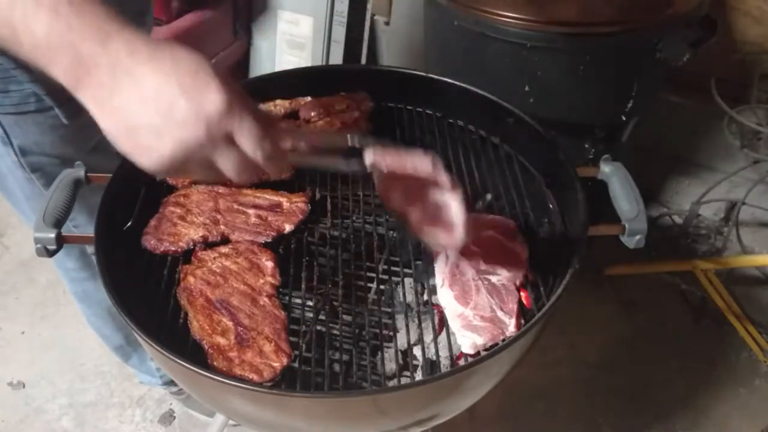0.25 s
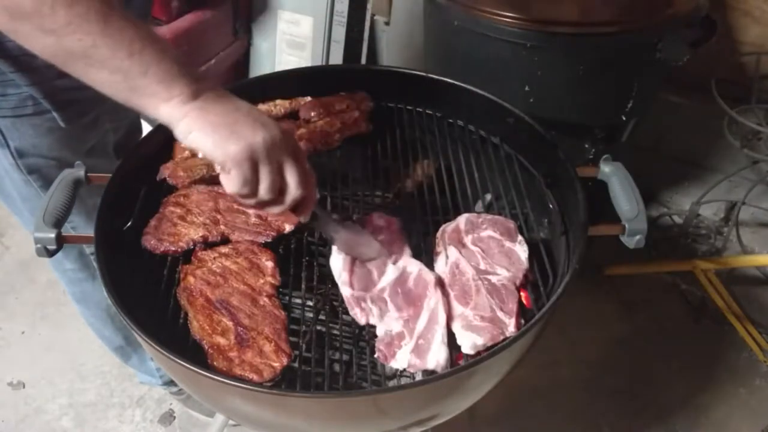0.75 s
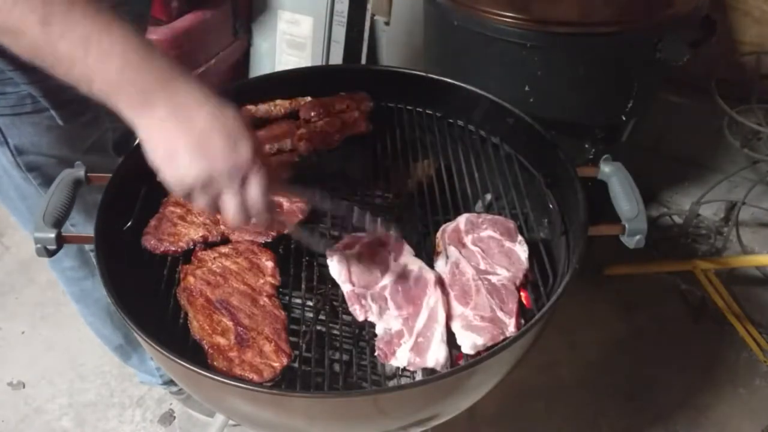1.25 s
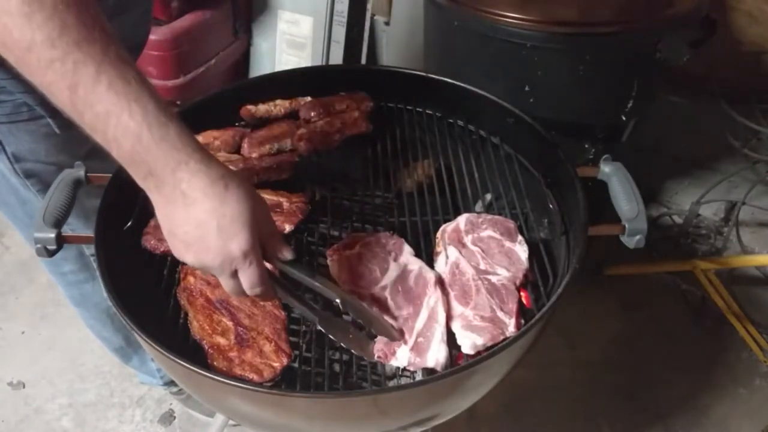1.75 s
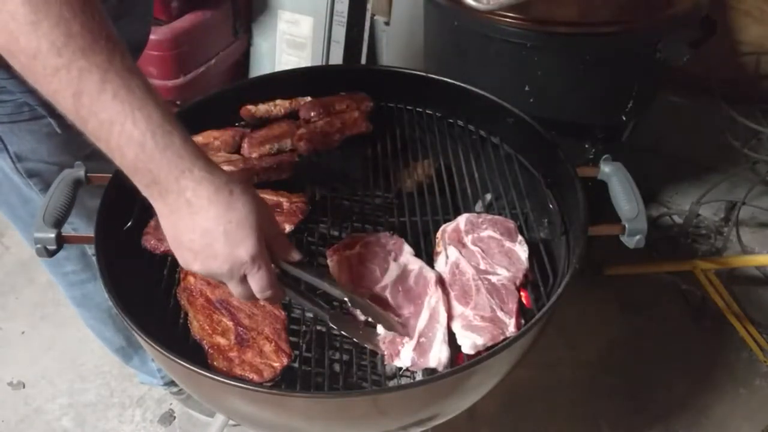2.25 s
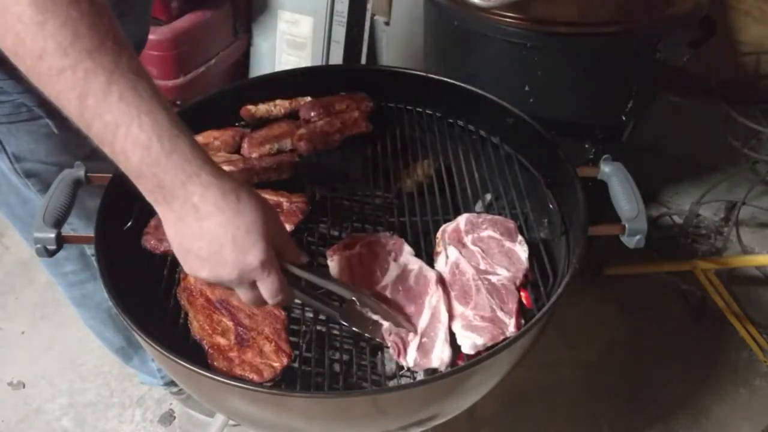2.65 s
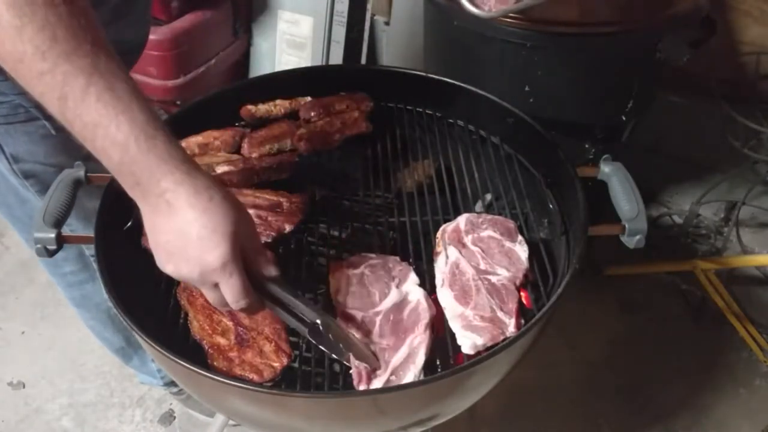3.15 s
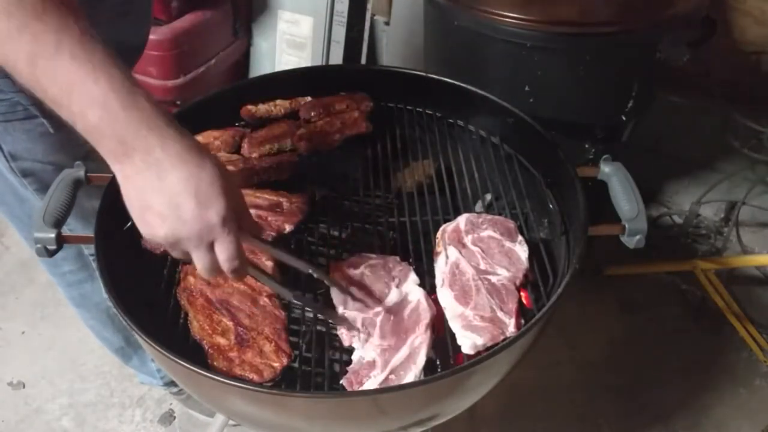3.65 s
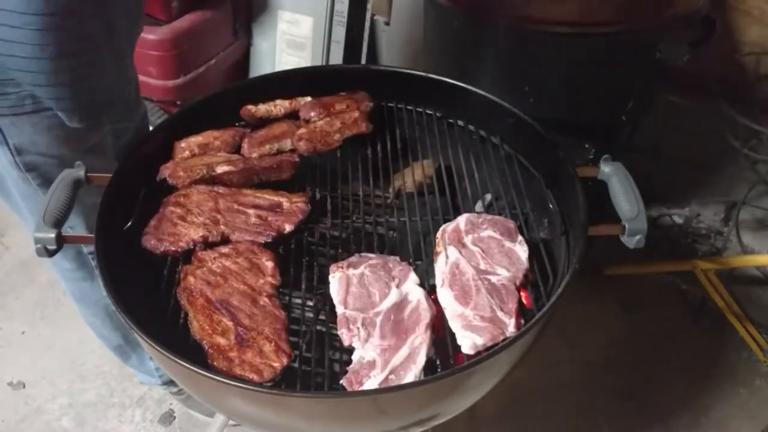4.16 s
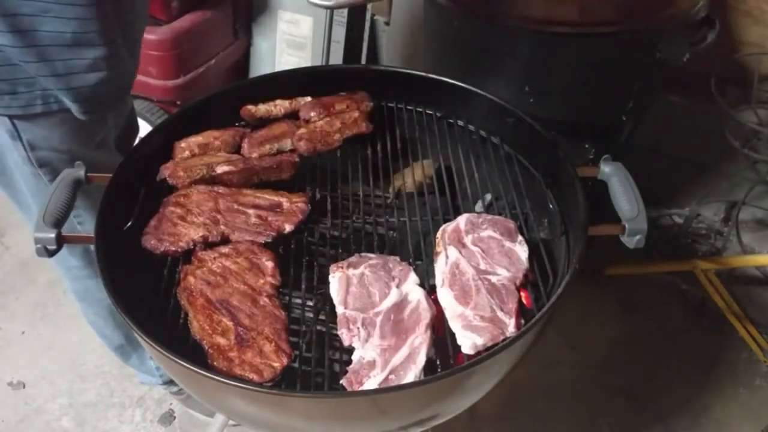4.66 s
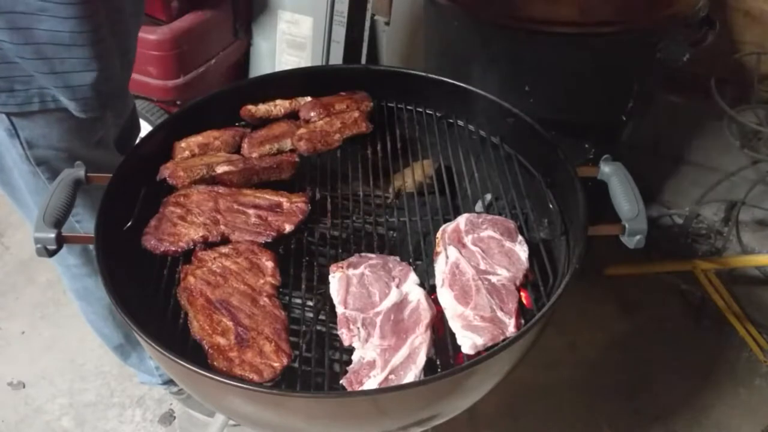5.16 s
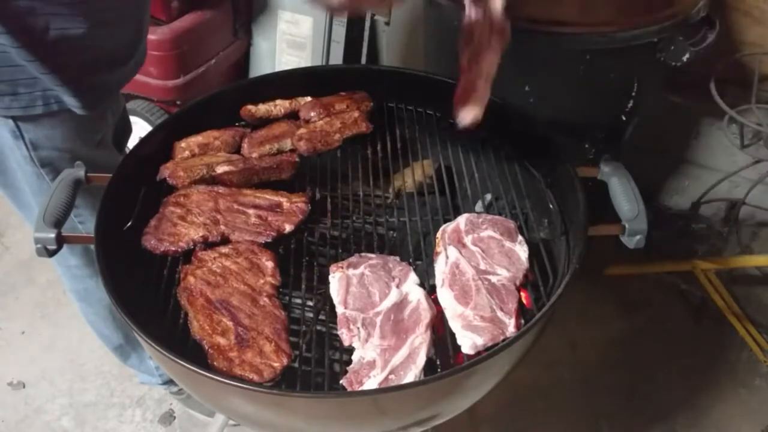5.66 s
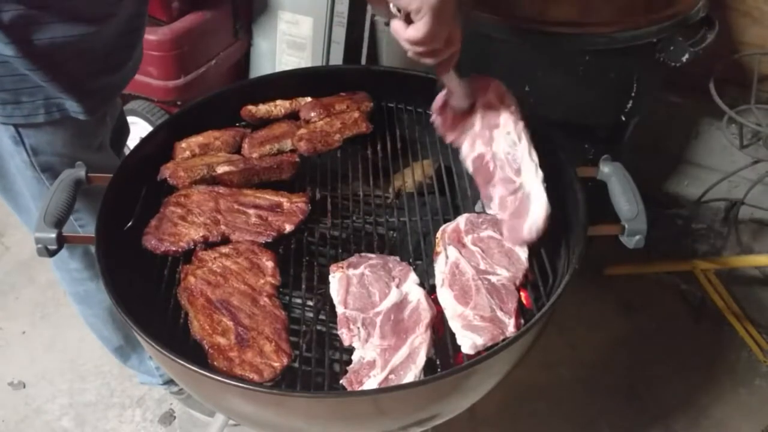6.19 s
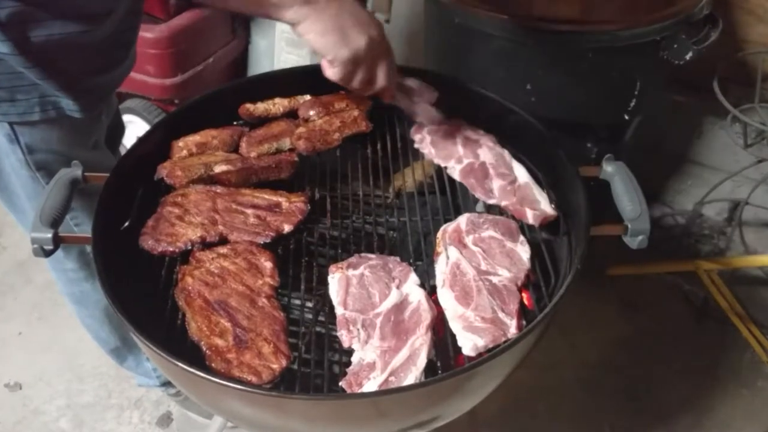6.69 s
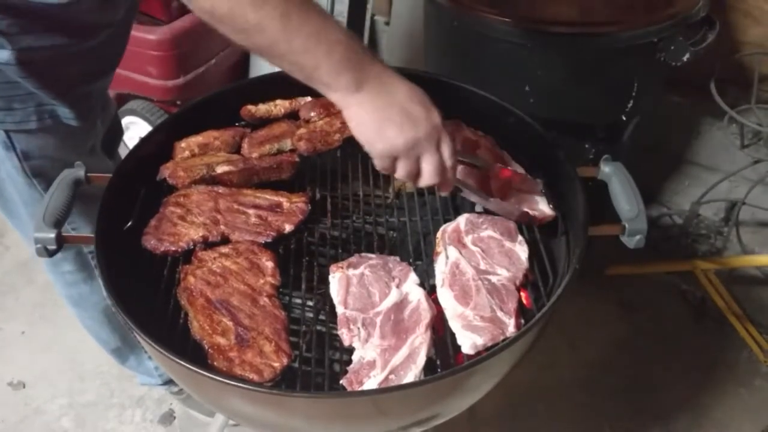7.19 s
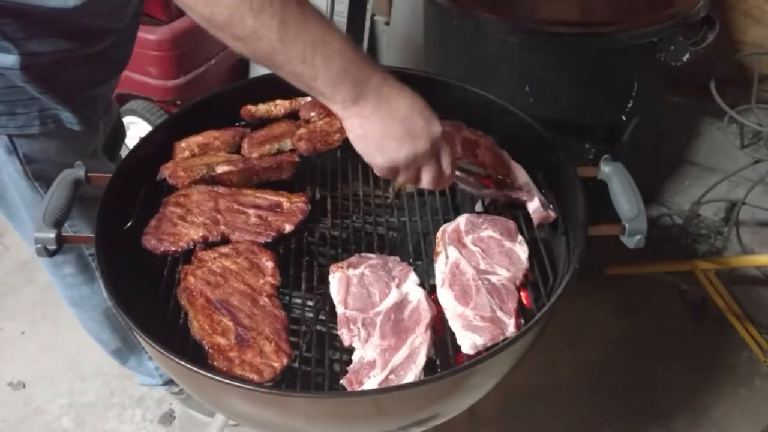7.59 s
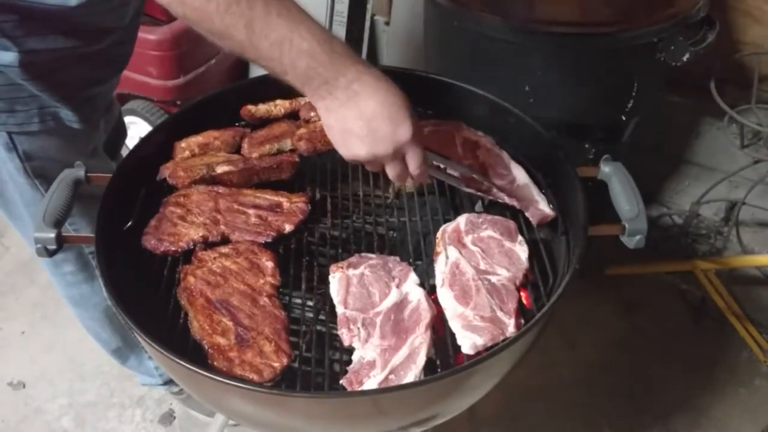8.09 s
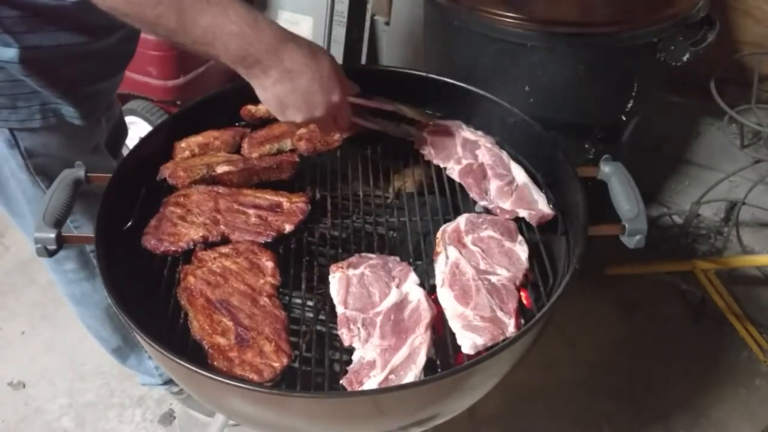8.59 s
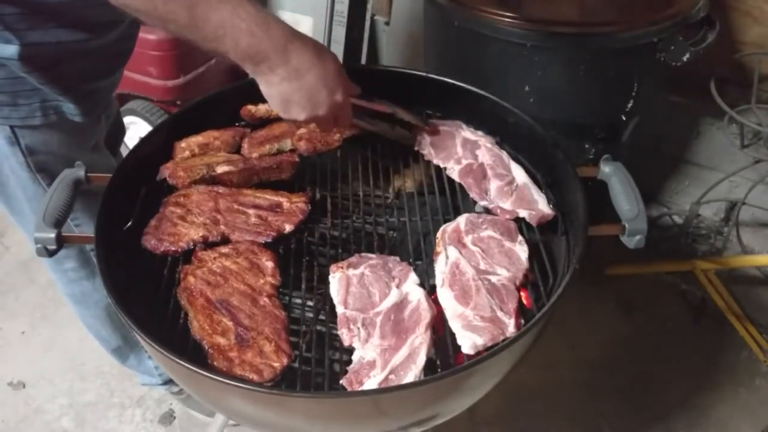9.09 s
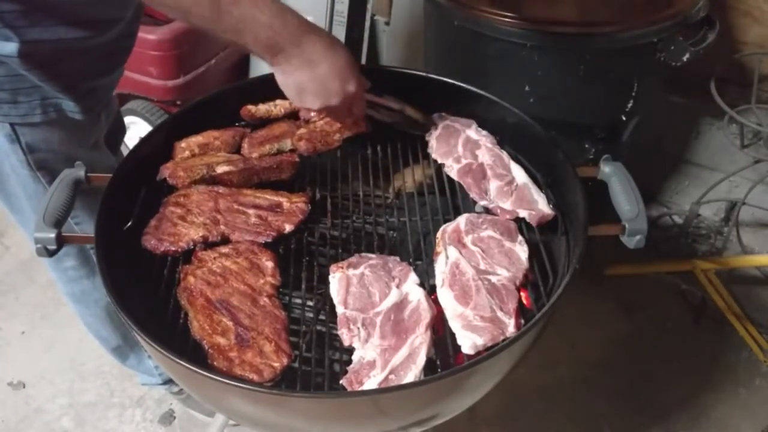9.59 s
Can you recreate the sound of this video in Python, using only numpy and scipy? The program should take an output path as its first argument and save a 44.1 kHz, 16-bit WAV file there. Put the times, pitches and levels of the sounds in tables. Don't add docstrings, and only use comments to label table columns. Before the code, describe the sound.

Metal tongs nudge, knock and tap a grill grate over faint meat sizzle and a low fan hum, with one sharp tray snap and clatter midway.

```python
import sys
import numpy as np
from scipy import signal
from scipy.fft import rfft, irfft
from scipy.io import wavfile
from scipy.ndimage import uniform_filter1d

SR = 44100
rng = np.random.default_rng(int(sys.argv[2]) if len(sys.argv) > 2 else 0)


def undo_db(level):
    steps = np.asarray(level, float) / 20
    return 10 ** steps


def put_to_file(sound):
    columns = np.atleast_2d(sound).T
    safe = np.clip(columns, -1, 1)
    whole_steps = np.round(safe * 32767)
    wavfile.write(sys.argv[1], SR, whole_steps.astype(np.int16))


N = 433944


def curve(table):
    return np.interp(np.arange(N) / SR, *np.array(table).T)


def at_hz(points, hz):
    p = np.array(points, float)
    return np.interp(np.log(np.maximum(hz, 1)), np.log(p[:, 0]), p[:, 1])


def shape(x, gain):
    size = x.shape[-1]
    return irfft(rfft(x) * gain(np.arange(size // 2 + 1) * SR / size), size)


def band(x, lo_hz, hi_hz):
    return signal.sosfilt(signal.butter(2, [lo_hz, hi_hz], "band", fs=SR, output="sos"), x)


def unit(x):
    return x / np.sqrt(np.mean(x ** 2))


def walk(rate):
    k = int(SR / rate)
    levels = np.repeat(rng.standard_normal(N // k + 1), k)
    return 1.26 * uniform_filter1d(uniform_filter1d(levels, k), k)[:N]


def motor():
    # (time [s], level [dB])
    hum = [
        (0.0, -56.5),
        (0.6, -54),
        (2.3, -56.5),
        (3.1, -58.5),
        (4.1, -61),
        (6.05, -55),
        (7.7, -53.5),
        (8.06, -54),
        (8.63, -55),
        (9.84, -58),
    ]
    # (frequency [Hz], width [Hz], level over hum [dB])
    resonances = [
        (116.6, 6, -12.5),
        (280, 27, -12),
        (771.5, 5.1, -12),
        (832, 10.8, -14.5),
    ]
    # (frequency [Hz], level [dB per Hz])
    air_colour = [(45, -24), (62, -1), (100, -5.5), (200, 5), (400, -1.5), (900, -5.5), (2000, -16.5),
                  (4000, -14)]
    whine_hz = 471.7

    gain = undo_db(uniform_filter1d(curve(hum), 4000))
    phase = 2 * np.pi * np.cumsum(whine_hz + 0.735 * walk(7.2)) / SR
    whine = np.sqrt(2) * np.sin(phase) * undo_db(1.2 * walk(9.4))
    noise = rng.standard_normal((2, N))
    casing = sum(undo_db(db) * unit(band(noise, hz - w / 2, hz + w / 2)) for hz, w, db in resonances)
    air = unit(shape(noise[:, ::-1], lambda f: undo_db(at_hz(air_colour, f))))
    air = air * undo_db(-3.5 + 0.09 * walk(3.72))
    return gain * (whine * np.array([[1], [.3]]) + casing + air)


def sizzle():
    # (time [s], level [dB])
    flares = [(0.0, -47.5), (0.35, -50), (1.51, -50), (2.9, -51.5), (4.2, -52), (6.3, -52.5), (6.52, -48.5),
              (7.2, -53), (7.62, -50), (8.2, -53.5), (9.84, -55)]
    # (frequency [Hz], level [dB per Hz])
    steam = [(300, -2), (1000, -1), (2000, -2), (4000, 0.5), (7000, -1), (9500, 0.5), (10400, -4.5),
             (11300, 1), (12500, -9.5), (13000, -13), (13500, -9), (15000, -9.5), (15500, -7), (15800, -45)]
    # (time [s], peak level [dB])
    bursts = [
        (0.838, -37),
        (2.4703, -41),
        (4.5186, -26),
        (4.6149, -38),
        (6.2813, -22.5),
        (6.3294, -44),
        (6.7964, -42),
        (7.6335, -38),
    ]

    crackles = rng.random(N) < 900 / SR
    crackle = crackles * undo_db(1.3 * rng.exponential(size=N)) * rng.standard_normal(N)
    hiss = (rng.standard_normal((2, N)) + 0.14 * unit(crackle)) * undo_db(0.96 * walk(9))
    hiss = unit(shape(hiss, lambda f: undo_db(at_hz(steam, f)))) * undo_db(curve(flares) + 4.0)
    pops = np.zeros((2, N))
    fade = np.exp(-np.arange(40) / 9)
    for s, db in bursts:
        start = int(s * SR)
        pops[:, start:start + 40] = undo_db(db) * rng.standard_normal((2, 40)) * fade
    return hiss + band(pops, 1800, 12000)


def strikes(events, modes, colour_db, rise_s, rattle_s, tail_s, tail_db, crack_db, ring_s,
            scatter_db=3.5, top_hz=10500):
    # (low edge [Hz], high edge [Hz] or the object's top, share of tail time [1])
    blow_bands = [
        (147, 555, 2),
        (756, 2640, 0.88),
        (2160, 5500, 0.45),
        (4330, None, 0.043),
    ]

    out, t = np.zeros((2, N + SR)), np.arange(SR // 4) / SR
    hz, db, t60 = np.repeat(modes, 3, axis=0).T[:, :, None]
    hz = hz * (1 + 0.0234 * rng.standard_normal(hz.shape))
    rings = np.sin(2 * np.pi * hz * t) * undo_db(db - 60 * t / np.minimum(t60, ring_s))
    swell = 1 - np.exp(-(t + 1 / SR) / rise_s)
    for s, blow_db, hard_db in events:
        band_db = blow_db + np.array(colour_db) + hard_db * (np.arange(len(blow_bands)) - 1)
        ring = undo_db(scatter_db * rng.standard_normal(len(hz))) @ rings
        noise = rng.standard_normal((3, 2, len(t)))
        crack = noise[0] * swell * np.exp(-t / rattle_s)
        chatter = crack + 0.27 * noise[2] ** 3 * swell * undo_db(-60 * t / tail_s)
        ringing = signal.fftconvolve(chatter, ring[None], axes=1)[:, :len(t)]
        body = unit(ringing) + undo_db(crack_db) * unit(crack)
        start = int(s * SR)
        for (lo, hi, share), level_db in zip(blow_bands, band_db):
            tail = unit(noise[1] * swell) * undo_db(tail_db - 60 * t / (share * tail_s))
            part = band(body + tail, lo, hi or top_hz)
            peak = np.sqrt(uniform_filter1d(part ** 2, 256).max(axis=1, keepdims=True))
            out[:, start:start + len(t)] += undo_db(level_db) * part / peak
    return out[:, :N]


def nudges():
    # (time [s], level [dB], hardness [dB per band upward])
    blows = [(0.719, -49.5, .7), (1.636, -43, 1), (1.689, -44, -1.5), (1.901, -42, 5), (2.079, -48, -1.8),
             (3.23, -54, 3), (3.826, -53, 6), (6.349, -50, 7), (8.199, -59, 4), (2.413, -43, 4),
             (9.085, -39, 2), (1.708, -52, -7)]
    # (frequency [Hz], level [dB], time to fall 60 dB [s])
    kettle = [(181, -10.5, .15), (266, -15, 0.2), (546, 3.5, 0.18), (773, -0.5, 0.093), (977, -6.5, 0.12),
              (1977, 1.5, 0.06), (4270, -3, 0.058), (6770, 11, .04)]
    # (level of each band, low to high [dB])
    colour_db = [1, 1.5, -1, -7]
    return undo_db(-2.0) * strikes(blows, kettle, colour_db, rise_s=0.0023, rattle_s=0.011, tail_s=0.16,
                               tail_db=15.0, crack_db=-1.0, ring_s=0.22)


def knock():
    # (time [s], level [dB], hardness [dB per band upward])
    blows = [
        (2.269, -35.5, 2.2),
    ]
    # (frequency [Hz], level [dB], time to fall 60 dB [s])
    bowl = [(517, -19, 0.19), (690, -26, 0.29), (1040, 11, 0.15), (1340, -32, 0.15), (1910, 14, 0.18),
            (2190, 13, 0.1), (2552, -39, 5.0), (3285, 11, 0.16), (3320, -12, 0.092), (5087, -36, 5.0),
            (6020, 4, 0.099), (7040, -1, 0.087)]
    # (level of each band, low to high [dB])
    colour_db = [-7.5, 3.5, 5, -1.2]
    return strikes(blows, bowl, colour_db, rise_s=0.00012, rattle_s=0.0034, tail_s=0.22,
                   tail_db=15.0, crack_db=0.34, ring_s=0.083)


def raps():
    # (time [s], level [dB], hardness [dB per band upward])
    blows = [
        (3.4395, -31.5, 1.2),
        (3.469, -60, -1.5),
    ]
    # (frequency [Hz], level [dB], time to fall 60 dB [s])
    rim = [(530, 4, 0.079), (750, -13, .2), (1040, -12, 0.048), (2080, -16, 0.04), (3000, -9, 0.24),
           (3170, -4, 0.33), (3560, -11, 0.088), (4270, -29, 0.11), (6099, -31, 0.096), (6368, -24, 0.13)]
    # (level of each band, low to high [dB])
    colour_db = [-7, 3.5, 2.5, -12]
    return strikes(blows, rim, colour_db, rise_s=0.00016, rattle_s=0.0021, tail_s=0.29,
                   tail_db=12.0, crack_db=0.33, ring_s=0.17)


def snap():
    # (time [s], level [dB], hardness [dB per band upward])
    blows = [
        (4.3172, -15, -1),
    ]
    # (frequency [Hz], level [dB], time to fall 60 dB [s])
    sheet = [(333, -5, 0.03), (835, -3.5, 0.016), (1210, 7, 0.0097), (3610, -3, 0.01), (6140, 13.5, 0.016),
             (7300, -14, 0.0086), (9150, 0, 0.0088), (11800, 1, 0.0054)]
    # (level of each band, low to high [dB])
    colour_db = [-9.5, 0.5, -3, -0.5]
    return undo_db(2.0) * strikes(blows, sheet, colour_db, rise_s=0.00005, rattle_s=0.000074, tail_s=0.0074,
                              tail_db=3.7, crack_db=1.8, ring_s=0.031, scatter_db=7.0, top_hz=16300)


def scrape():
    # (start [s], length [s], level [dB], brightness [dB per resonance upward])
    strokes = [
        (4.33, 0.0051, -37.5, -14),
        (4.383, .015, -56, 1.5),
        (4.523, 0.036, -49.5, 2),
        (4.611, 0.036, -49.5, 1),
    ]
    # (low edge [Hz], high edge [Hz], level [dB], fade after a stroke [dB per s])
    resonances = [
        (634, 1670, -2.5, 118),
        (2870, 5000, 1, 450),
        (6300, 7500, -4.5, 802),
    ]
    rise = 471

    roughness = undo_db(1.9 * rng.standard_normal(N // 64 + 1).repeat(64)[:N])
    grains = rng.standard_normal((2, N)) * roughness
    t, out = np.arange(N) / SR, 0
    s, length, db, bright_db = np.array(strokes).T[:, :, None]
    for step, (lo, hi, own_db, fade) in enumerate(resonances):
        loss_db = rise * np.maximum(s - t, 0) + fade * np.maximum(t - s - length, 0)
        level = undo_db(db + own_db + step * bright_db - loss_db).sum(axis=0)
        out = out + unit(band(grains, lo, hi)) * level
    return out


def tray_clatter():
    # (time [s], level [dB], hardness [dB per band upward])
    blows = [
        (4.528, -29, -3),
        (4.548, -26, 0.5),
        (4.564, -40, 4),
        (4.579, -45, 6.5),
        (4.606, -42.5, -5),
        (4.643, -34, 1),
        (4.653, -57, 3),
        (4.864, -44.5, -6),
        (4.914, -52.5, .6),
    ]
    # (frequency [Hz], level [dB], time to fall 60 dB [s])
    tray_modes = [(856, -2.5, .03), (1200, -25, 0.021), (1796, 9.5, 0.025), (3320, -11, .02),
                  (4480, 4, 0.023), (6450, 4, 0.016), (7450, 1, 0.017)]
    # (level of each band, low to high [dB])
    colour_db = [-16, 0.5, -11, -7]
    return undo_db(-3.0) * strikes(blows, tray_modes, colour_db, rise_s=0.00043, rattle_s=0.0016, tail_s=0.11,
                               tail_db=22.2, crack_db=0.5, ring_s=0.033, top_hz=8700)


def taps():
    # (time [s], level [dB], hardness [dB per band upward])
    blows = [
        (7.284, -31, 3.5),
        (7.314, -45, -1),
        (7.3505, -36, -2.5),
        (7.403, -49.5, -.6),
    ]
    # (frequency [Hz], level [dB], time to fall 60 dB [s])
    tongs = [(527, 2.5, 0.08), (700, -8, .12), (228, -16, .08), (1280, -16, 5.0), (2197, 6, 0.05),
             (2240, -2, 0.056), (2920, 0.5, 0.18), (3300, -3, 0.26), (3434, -6.5, 0.27), (3740, -10, 0.2),
             (4900, -17, 0.053), (5750, -7, 0.031), (6100, -7, 0.26), (7080, -10, 0.036)]
    # (level of each band, low to high [dB])
    colour_db = [-6, 4, 5, -10]
    return strikes(blows, tongs, colour_db, rise_s=0.001, rattle_s=0.0033, tail_s=0.17,
                   tail_db=10.6, crack_db=-20.5, ring_s=0.086)


def clanks():
    # (time [s], level [dB], hardness [dB per band upward])
    blows = [
        (9.714, -30.5, -0.8),
        (9.744, -40.5, 2.5),
    ]
    # (frequency [Hz], level [dB], time to fall 60 dB [s])
    grate = [(510, -29.5, 0.47), (680, 2, 0.24), (770, 3.5, 0.36), (1300, -5, 0.16), (1950, -7, 0.28),
             (2910, -7, 0.11), (3360, 5, 0.06), (3402, -1, 0.26), (3700, -24, 0.32), (3700, 5, 0.1),
             (3950, -7, 0.1), (4460, -34, 0.6)]
    # (level of each band, low to high [dB])
    colour_db = [-6.5, 2, 0.5, -15]
    return strikes(blows, grate, colour_db, rise_s=0.00022, rattle_s=0.015, tail_s=0.22,
                   tail_db=13.4, crack_db=-1.4, ring_s=0.3, top_hz=6940)


def ports(paths, deepest_db, tilt_db=0):
    # (frequency [Hz], side minus mid [dB])
    cancelling = [(60, 10), (130, -0.5), (250, 3), (1000, -14), (1900, -8.5), (2350, 6), (2600, 17),
                  (2900, 3.5), (3500, -12.5), (4600, 1), (5200, 14), (5800, -4), (9000, -8.5), (15000, 2)]
    # (frequency [Hz], share of the sum that leans left [1])
    lean = [(60, -0.29), (400, -0.055), (2400, -0.07), (4400, 0.053), (8000, 0.2), (15000, 0.012)]

    def side_db(f):
        tilt = tilt_db * np.clip(np.log2(f / 1500 + 1e-3), -3, 2.5)
        return np.minimum(at_hz(cancelling, f), deepest_db) + tilt

    mid = shape(paths[0], lambda f: (1 + undo_db(2 * side_db(f))) ** -.5)
    side = shape(paths[1], lambda f: (1 + undo_db(-2 * side_db(f))) ** -.5)
    return mid, side + shape(mid, lambda f: at_hz(lean, f))


def camera_db():
    # (time [s], depth [dB])
    ducks = [
        (4.325, 14),
        (4.56, 13.5),
    ]
    attack_s, hold_s, release = 0.054, 0.13, 10

    s, depth_db = np.array(ducks).T[:, :, None]
    late = np.maximum(np.arange(N) / SR - s, 0)
    down = depth_db * (1 - np.exp(-late / attack_s)) - release * np.maximum(late - hold_s, 0)
    return -np.maximum(down.max(axis=0), 0)


def scene():
    steady = (motor() + sizzle()) * undo_db(camera_db())
    steel = nudges() + knock() + raps() + taps() + clanks()
    light = snap() + scrape() + tray_clatter()
    light = band(band(light, 325, 10700), 290, 16400)
    groups = [ports(steel * undo_db(2.0), 1.5, tilt_db=1.5), ports(light, 6.9, tilt_db=1.5), ports(steady, 30.0)]
    mid, side = np.sum(groups, axis=0)
    return np.array([mid + side, mid - side])


def band_limit(x):
    return signal.sosfilt(signal.butter(12, 15650, fs=SR, output="sos"), x)


def record(dry):
    # (frequency [Hz], threshold [spreads of chance])
    starved = [(7000, -2.5), (7800, 0.4), (8400, -1), (9800, 0.06), (10600, 0), (11800, 1.2), (12400, -1.7),
               (13100, 0.2), (14000, 0), (15400, -0.3), (15700, 3)]
    spared_hz = 750

    hz, s, spec = signal.stft([dry[0] + dry[1], dry[0] - dry[1]], SR, nperseg=512)
    chance = rng.standard_normal((len(hz) // 4 + 1, len(s) // 6 + 1)).repeat(4, axis=0).repeat(6, axis=1)
    chance = 1.4 * uniform_filter1d(chance, 10, axis=1)[:len(hz), :len(s)]
    from_edge = np.abs((hz + spared_hz / 2) % spared_hz - spared_hz / 2)
    threshold = at_hz(starved, hz) - 1.2 * (from_edge < 50)
    power = uniform_filter1d(uniform_filter1d(np.abs(spec) ** 2, 5, axis=1), 3, axis=2)
    gain_db = camera_db()[np.minimum(s * SR, N - 1).astype(int)]
    loud_enough = power.sum(axis=0) > undo_db(2 * -58.0)
    lucky = chance - .13 * gain_db > threshold[:, None]
    sum_strong = power[0] > power[1] * undo_db(2 * (-7.0 + 2.5 * chance))
    side_loud = power[1] > undo_db(2 * -52.0)
    spec[0] *= sum_strong | side_loud
    kept = spec * (loud_enough | lucky)
    mid, side = signal.istft(kept, SR, nperseg=512)[1][:, :N] / 2
    return band_limit(np.array([mid + side, mid - side]))


dry = scene()
out = record(dry)
put_to_file(out)
```